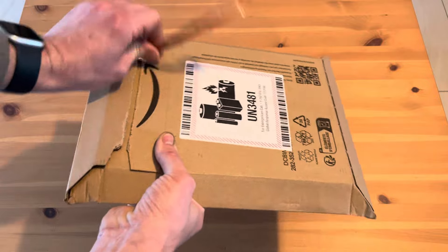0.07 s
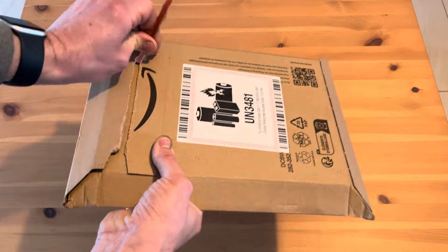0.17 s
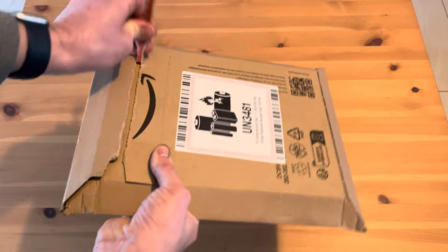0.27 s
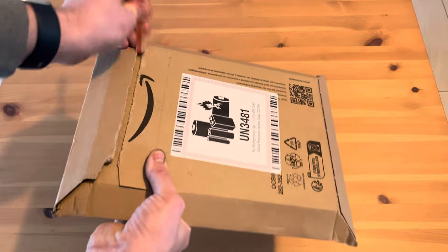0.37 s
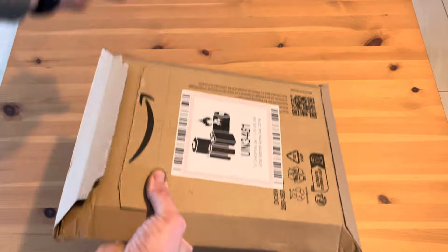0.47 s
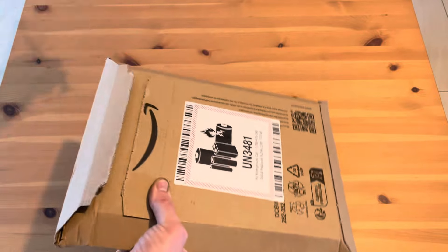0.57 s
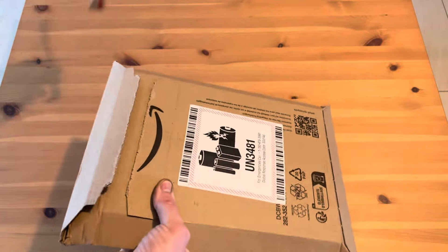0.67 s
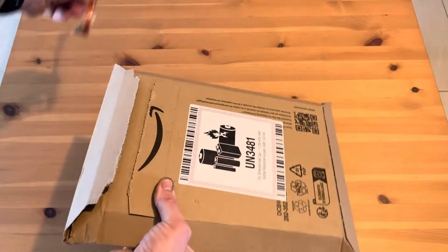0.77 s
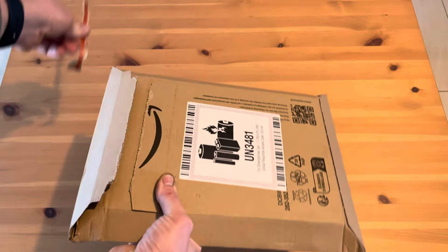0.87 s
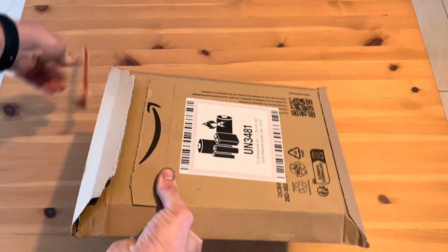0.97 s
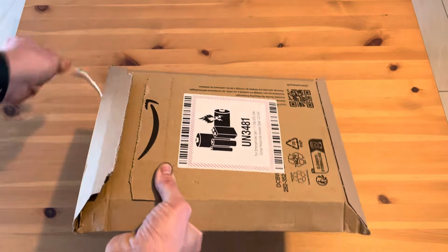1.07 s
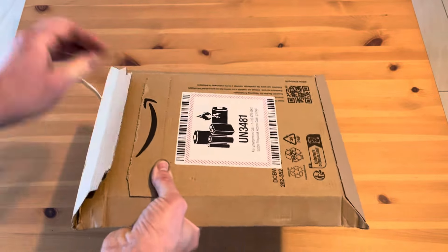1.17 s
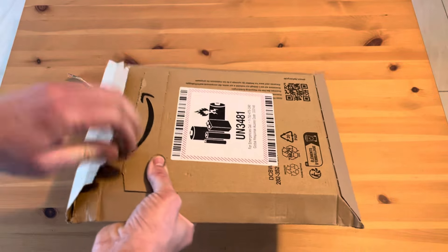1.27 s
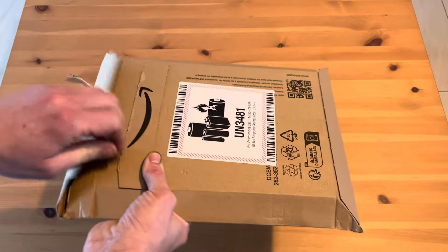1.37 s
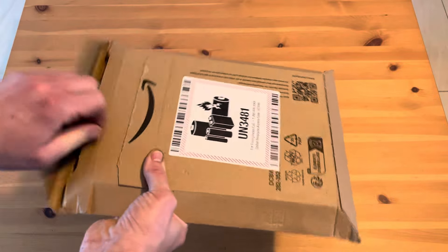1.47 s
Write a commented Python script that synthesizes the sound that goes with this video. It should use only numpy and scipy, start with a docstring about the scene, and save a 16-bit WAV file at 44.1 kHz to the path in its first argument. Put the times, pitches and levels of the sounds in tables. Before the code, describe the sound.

A cardboard mailer's tear strip is pulled off in a quick, growing rip with hollow thumps and three hard cracks; short room echo, near silence, a small card knock, then faint gripping rustle, recorded close indoors in stereo.

```python
"""A tear strip is ripped out of a cardboard mailer held over a table in a bare room.
First fibres crackle and scrape as filtered bursts of noise, and slips shake the hollow board so that it rumbles.
Glue lets go in sharp snaps and hollow pops that slide down in pitch, and the whole mailer jolts.
Then the room rings out as fading noise, and the loose strip ticks and knocks card.
At the end a hand grips the flap; a quiet room tone lies under it all."""
import sys
import numpy as np
from scipy import signal
from scipy.fft import rfft, irfft
from scipy.io import wavfile

SR = 44100
rng = np.random.default_rng(int(sys.argv[2]) if len(sys.argv) > 2 else 0)


def field_ratio(decibels):
    """Amplitude ratio for a level in dB (20 dB per decade); scalars and array-likes work."""
    return 10 ** (np.asarray(decibels, dtype=float) / 20)


def unload_wav(signal):
    """Save mono or channel-first audio to the path in sys.argv[1] as 16-bit WAV at rate SR, clipped to [-1, 1]."""
    wavfile.write(
        sys.argv[1],
        SR,
        np.round(np.clip(np.atleast_2d(signal).T, -1, 1) * 32767).astype(np.int16),
    )


N = 66150  # samples in the scene
HZ = np.fft.rfftfreq(2 * N, 1 / SR)  # frequency grid of all the filters


def unit(x):
    """Scales a sound to an rms of 1."""
    return x / np.sqrt(np.mean(x ** 2))


def age_since(start):
    """Seconds since an event began, 0 before it."""
    return np.maximum(np.arange(N) / SR - start, 0)


def fade(age, t60):
    """Natural dying away: 60 dB down after t60 seconds."""
    return 1000. ** (-age / t60)


def table_db(table):
    """Reads a table of (f/Hz, level/dB) at every frequency of the grid."""
    f, db = np.array(table, float).T
    return np.interp(np.log(HZ + 1), np.log(f), db)


def weigh(x, gain):
    """Multiplies each frequency of a sound by a gain."""
    return irfft(rfft(x, 2 * N) * gain)[..., :N]


def colour(x, db):
    """Filters with this gain in dB, never sounding before its input (minimum phase)."""
    cepstrum = irfft(db * np.log(10) / 20)
    cepstrum[1:N] *= 2
    cepstrum[N + 1:] = 0
    return weigh(x, np.exp(rfft(cepstrum)))


# how far apart the two ports are in phase: f/Hz, phase/rad
PORT_PHASE = [(0, 0), (1500, .7), (3300, .9), (4500, -.2), (6500, -1.1), (8300, -np.pi),
              (11800, -2 * np.pi), (14500, -3 * np.pi)]
# how much louder the first port is than the second: f/Hz, level/dB
PORT_BALANCE = [(200, 2.0), (380, 4.0), (700, 0.0), (1290, 3.5), (2380, 3.0), (4400, 5.5), (8120, 0.0)]


def ports(x):
    """Two microphone ports hear a near sound, each with its own phase and level."""
    f, phase = np.array(PORT_PHASE).T
    half_phase = np.interp(HZ, f, phase) * .5j
    half_level = table_db(PORT_BALANCE) * np.log(10) / 40
    half = half_phase + half_level
    return weigh(x, np.exp([half, -half]))


def spread(like):
    """Stereo noise: a share heard alike by both ports, the rest different in each."""
    like = np.clip(like, 0, 1)
    shared = ports(rng.standard_normal(N))
    separate = rng.standard_normal((2, N))
    return np.sqrt(like) * shared + np.sqrt(1 - like) * separate


# colour of the room tone, only its shape counts: f/Hz, level/dB
HUSH = [(20, -31), (50, -1.5), (100, -2), (400, -16), (1000, -32), (5000, -42.5), (8300, -50.5),
        (11000, -37), (15000, -43)]


def hush():
    """The quiet room tone: steady coloured noise, mostly alike in both ports."""
    return unit(colour(spread(0.91), table_db(HUSH))) * field_ratio(-70)


# echo of the room, band by band: f/Hz, t60/s, level/dB, likeness of left and right (0 to 1)
ROOM = [(70, 0.99, -11.5, 1), (158, .62, -5.5, 0.97), (280, 0.8, -11.5, 0.83), (540, 0.76, -11, 0.24),
        (1030, 0.76, -8.5, 0.067), (2200, 0.67, -9, 0.78), (4100, 0.59, -13, 1), (8500, 0.053, -17, 0.95),
        (10600, 0.48, -18.5, 0.94)]


def room(x):
    """The room rings out: overlapping bands of noise, each dying away at its own pace."""
    gap_s = 0.00083  # the echo swells up over this time
    t = np.arange(N) / SR
    centres = np.log([row[0] for row in ROOM])
    echo = 0
    for k, (hz, t60, db, like) in enumerate(ROOM):
        share = np.sqrt(np.interp(np.log(HZ + 1), centres, np.arange(len(ROOM)) == k))
        band = weigh(spread(like), share)
        evened = band / np.sqrt(t60 * SR / np.log(1e6))  # a long decay brings no extra energy
        echo = echo + evened * fade(t, t60) * field_ratio(db)
    echo = echo * np.clip(t / gap_s, 0, 1) ** 2
    return signal.fftconvolve(echo, x[None], axes=1)[:, :N]


# gain of the first bounces: f/Hz, level/dB
BOUNCE = [(250, -13), (600, -11.5), (1500, -3.5), (4000, -6), (7000, -10.5), (12000, -17.5)]


def table_top(x):
    """First bounces off table and hands: scattered in time, from the sides, opposite in the two ports."""
    t60_s = 0.017
    noise = rng.standard_normal(2048) * fade(np.arange(2048) / SR, t60_s)
    spectrum = rfft(noise)
    taps = irfft(spectrum / np.abs(spectrum))[:1024]  # evened in colour, then cut short
    sides = np.outer([1, -1], taps)
    bounced = signal.fftconvolve(sides, x[None], axes=1)[:, :N]
    return colour(bounced, table_db(BOUNCE))


def bursts(rows, table):
    """Bursts of noise with a coloured peak; rows: t/s, level/dB, f/Hz, peak/dB, width/octaves, length/s."""
    out = np.zeros(N + 2048)
    noises = rng.standard_normal((len(rows), 1024))
    for (s, db, hz, peak_db, octaves, length), noise in zip(rows, noises):
        u = np.arange(1024) / SR / max(length, 3e-4)
        burst = noise * (1 - np.exp(-u * 1.7)) * np.exp(-u ** 1.2)
        spectrum = rfft(burst, 4096)
        burst = irfft(spectrum / np.abs(spectrum))[:1024]  # evened in colour, scattered in time
        peak = peak_db * np.exp(-(np.log2((HZ + 1) / hz) / octaves) ** 2)
        burst = colour(burst, table_db(table) + peak)[:2048]
        out[int(s * SR):][:2048] += burst * field_ratio(db) / np.abs(burst).max()
    return out[:N]


# ways the board and the air inside ring, relative to each other: f/Hz, level/dB, t60/s
BOARD = [(170.7, 0, 0.18), (256.4, 10, 0.039), (439, 9, 0.032), (766, -2.5, 0.014), (938, -18, 0.021),
         (1500, -9, 0.0067)]


def board(force):
    """The hollow mailer rings when a force shakes it; so small a panel radiates little bass."""
    low_hz = 122
    t = np.arange(N // 4) / SR
    ring = sum(field_ratio(db) * np.sin(2 * np.pi * hz * t) * fade(t, t60) for hz, db, t60 in BOARD)
    ring = signal.sosfilt(signal.butter(4, low_hz, "high", fs=SR, output="sos"), ring)
    return signal.fftconvolve(force, ring / np.abs(ring).max())[:N]


# thin rings of the knocked card: f/Hz, level/dB, t60/s
KNOCK_RINGS = [(761, -54, 0.27), (2720, -41, .015)]


def knock(start):
    """Knocked card: thin fading rings, and the board shaken by a single push."""
    force = np.zeros(N)
    force[int(start * SR)] = field_ratio(-33.5)
    age = age_since(start)
    rings = sum(field_ratio(db) * np.sin(2 * np.pi * hz * age) * fade(age, t60) for hz, db, t60 in KNOCK_RINGS)
    return rings, board(force)


# ticks of the loose strip: t/s, level/dB, ring f/Hz, ring above the click level/dB,
# ring width/octaves, extra level into the room/dB
TICKS = [(0.716, -49, 4240, 29, .22, 0), (0.989, -46, 12570, 12, 1, 16), (0.9927, -49.5, 4170, 33, 0.26, 6),
         (1.019, -33, 2716, 8, 0.54, 15)]
# colour of the click, only its shape counts: f/Hz, level/dB
TICK = [(550, 6.5), (1300, 5), (2500, -6), (7000, -3), (12000, -3.5), (16000, -26.5)]


def ticks():
    """The torn-off strip flicks about and last knocks card: its near sound, and what goes into the room."""
    length_s = 0.001229
    each = [bursts([(*row[:5], length_s)], TICK) for row in TICKS]
    rings, thud = knock(TICKS[-1][0])
    near = sum(each) + rings
    far = sum(tick * field_ratio(row[5]) for tick, row in zip(each, TICKS)) + thud + rings
    return near, far


# jolts of the whole mailer in the hand: t/s, level/dB, f/Hz
JOLTS = [(.005, -52.5, 88), (0.4, -32.5, 73.6), (1.337, -47.5, 100), (1.417, -42, 73.2)]


def jolts():
    """Soft low wobbles as the whole mailer jolts in the hand: sines that rise fast and fade."""
    rise_s, t60_s = 0.001, 0.2
    out = 0
    for s, db, hz in JOLTS:
        age = age_since(s)
        wobble = np.sin(2 * np.pi * hz * age) * (1 - np.exp(-age / rise_s))
        out = out + field_ratio(db) * wobble * fade(age, t60_s)
    return out


# pops of the board as each hold lets go: t/s, level/dB, settled f/Hz
POPS = [(.124, -31, 265.2), (.185, -22, 167), (.202, -31.5, 188), (.221, -25, 240), (.233, -23.5, 219),
        (.246, -23, 244), (.268, -20, 189.4), (.291, -25.5, 171), (.318, -20, 229), (.331, -19.5, 185),
        (.3555, -11, 300), (.379, -16, 615), (.399, -13, 331), (1.401, -35.5, 848), (1.417, -28.5, 955),
        (1.456, -31, 734), (1.479, -37, 830)]


def pops():
    """Short hollow thumps, sliding down in pitch as the tension of the board drops."""
    fall_hz, fall_s = 300, 0.0036  # starts this far above the settled pitch
    rise_s, t60_s = 0.0013, 0.046
    out = 0
    for s, db, hz in POPS:
        age = age_since(s)
        turns = hz * age + fall_hz * fall_s * (1 - np.exp(-age / fall_s))
        thump = np.sin(2 * np.pi * turns) * (1 - np.exp(-age / rise_s))
        out = out + field_ratio(db) * thump * fade(age, t60_s)
    return out


# snaps of glue and creases: t/s, level/dB, centre f/Hz, length/s
SNAPS = [(0.1, -33.5, 12100, 0.0012), (0.1186, -32.5, 6150, 0.0031), (0.127, -31, 1720, 0.0024),
         (0.1822, -28, 1270, 0.0062), (0.227, -26.5, 2000, 0.0068), (0.294, -24, 1470, 0.0013),
         (0.3224, -24, 1930, 0.001), (0.3531, -4.5, 3420, 0.00094), (0.3546, -5.5, 1620, 0.0012),
         (0.3766, -6.5, 4330, 0.002), (0.3771, -5, 1987, 0.0023), (0.3957, -4.5, 3420, 0.00097),
         (0.3983, -11.5, 5920, 0.0015), (1.385, -36, 2200, 0.0043), (1.448, -25.5, 1770, 0.0065),
         (1.4827, -27.5, 4020, 0.0028)]
# colour shared by the cracks, only its shape counts: f/Hz, level/dB
CRACK = [(290, -18.5), (500, -11), (944, -4.5), (1940, -10), (2520, -15.5), (4360, -15.5), (10500, -14),
         (15800, -27)]


def snaps():
    """Glue lets go: each crack is a short burst of noise with its own colour."""
    peak_db, octaves = 9, 0.18
    return bursts([(s, db, hz, peak_db, octaves, length) for s, db, hz, length in SNAPS], CRACK)


def clicks(rate, spread_db):
    """Random breaks at a rate per second, mostly small, a few large."""
    chance, side, size = rng.random((3, N))
    return (chance < rate / SR) * np.sign(side - .5) * field_ratio(-spread_db * np.log(1 - size))


def grains(rate, spread_db):
    """Breaks smeared into tiny noise bursts, each octave with its own, over a steady rasp."""
    grain_s, rasp_db = 0.00046, -3.5
    tail = np.exp(-np.arange(512) / SR / grain_s)
    out = 0
    for hz in 500 * 2 ** np.arange(6):
        smeared = signal.fftconvolve(np.abs(clicks(rate, spread_db)), tail)[:N]
        size = unit(smeared) + field_ratio(rasp_db)
        share = np.sqrt(np.clip(1 - np.abs(np.log2((HZ + 1) / hz)), 0, 1))
        out = out + weigh(size * rng.standard_normal(N), share)
    return out


# the two pulls, tearing and then gripping: t/s, crackle level/dB, board rumble level/dB, scrape level/dB
PULL = [
    [(0, -62.5, -60, -61.5), (.06, -57, -66, -67), (.1, -50.5, -56.5, -57.5), (.125, -42.5, -46, -44.5),
     (.145, -55.5, -51, -56.5), (.18, -41, -48, -48), (.19, -37.5, -30.5, -45), (.24, -32.5, -32, -33),
     (.3, -35, -38.5, -41.5), (.345, -33, -26, -29.5), (.4, -30.5, -30, -34), (.415, -50, -25, -58)],
    [(1.327, -60, -58, -75.5), (1.337, -45.5, -52, -58), (1.378, -68.5, -63, -55.5),
     (1.4, -59.5, -45, -40.5), (1.44, -55, -39.5, -41.5), (1.5, -43, -51, -43)],
]


def pull_gain(column):
    """How loud one column of the pulls is at each moment; silent between them."""
    t = np.arange(N) / SR
    pulls = [np.array(pull) for pull in PULL]
    return sum(field_ratio(np.interp(t, p[:, 0], p[:, column], left=-200, right=-200)) for p in pulls)


# colour of the crackle, only its shape counts: f/Hz, level/dB
CRACKLE = [(1180, -47), (2300, -1), (3920, -8), (9970, -6), (13600, -10), (15800, -4.5)]
# colour of the scrape, only its shape counts: f/Hz, level/dB
SCRAPE = [(300, -31), (600, 1), (1000, -2), (2400, -9.5), (6000, -18.5)]


def tearing():
    """Fibres crackle in the treble, the strip scrapes, and slips shake the board."""
    fibres = grains(rate=500, spread_db=2.5)
    slips = clicks(rate=1100, spread_db=3.5)
    crackle = unit(colour(fibres, table_db(CRACKLE))) * pull_gain(1)
    rubbing = fibres + 0.64 * unit(slips)
    scrape = unit(colour(rubbing, table_db(SCRAPE))) * pull_gain(3)
    steady_rms = np.sqrt(np.mean(board(slips) ** 2))
    rumble = board(slips * pull_gain(2)) / steady_rms
    return crackle + scrape + rumble


def scene():
    """The mailer near the phone, with bounces, room echo and room tone around it."""
    mailer = tearing() + snaps() + pops() + jolts()
    strip, strip_to_room = ticks()
    near = mailer + strip
    return ports(near) + table_top(near) + room(mailer + strip_to_room) + hush()


def roll_off(x):
    """The treble ends steeply here."""
    return signal.sosfilt(signal.butter(12, 15900, fs=SR, output="sos"), x)


# gain of the phone, which colours the top: f/Hz, level/dB
PHONE = [(8300, 2), (13500, 1), (15000, -5.5), (16000, -16.5)]


def record(dry):
    """The phone colours the top and cuts the lowest bass."""
    coloured = colour(dry, table_db(PHONE))
    bass_cut = signal.butter(2, 40.6, "high", fs=SR, output="sos")  # corner in Hz
    mix = signal.sosfilt(bass_cut, coloured)
    return roll_off(mix)


dry = scene()
out = record(dry)
unload_wav(out)
```